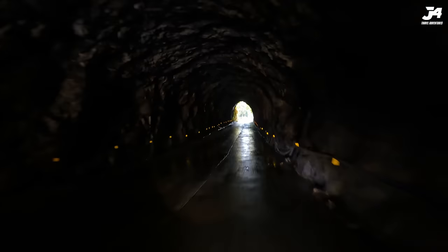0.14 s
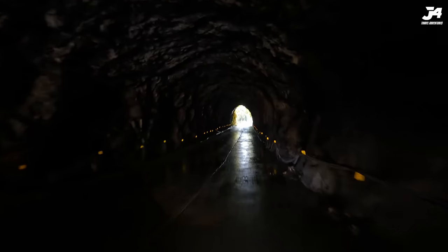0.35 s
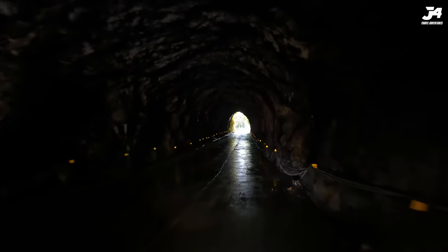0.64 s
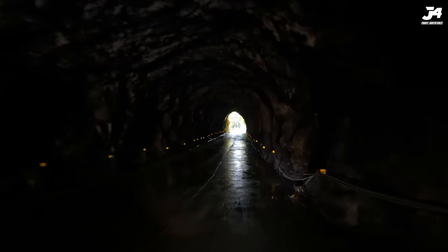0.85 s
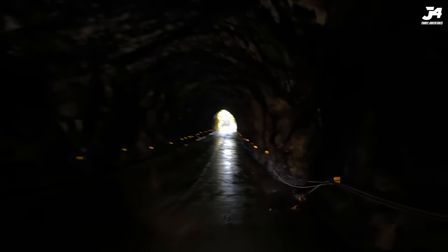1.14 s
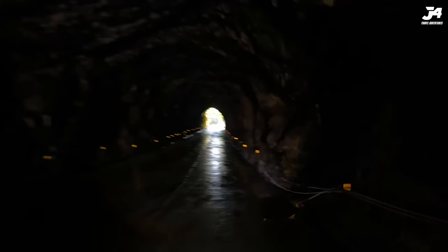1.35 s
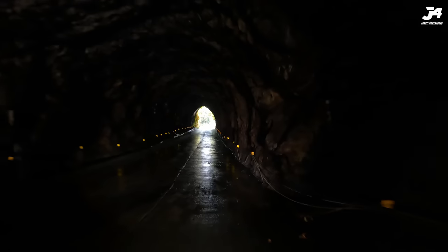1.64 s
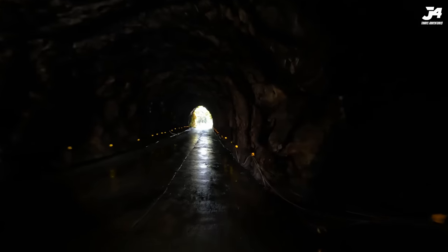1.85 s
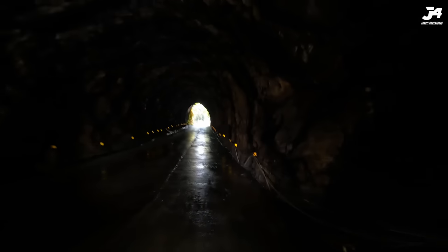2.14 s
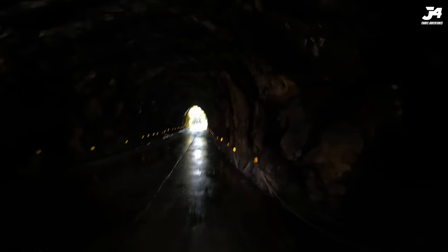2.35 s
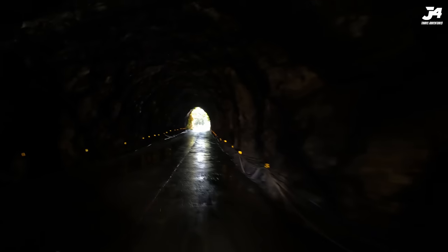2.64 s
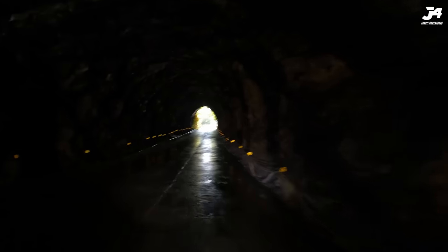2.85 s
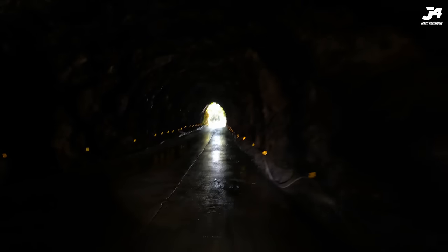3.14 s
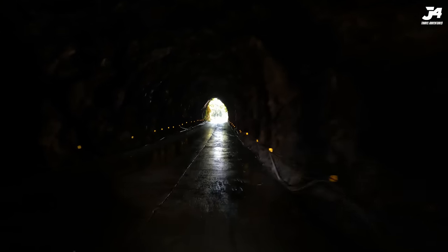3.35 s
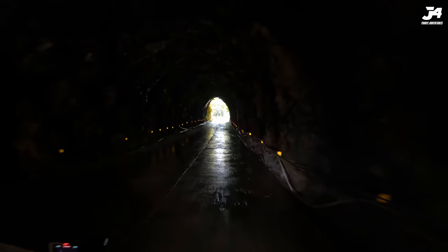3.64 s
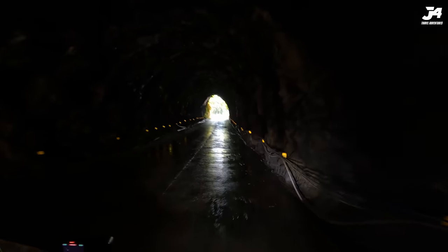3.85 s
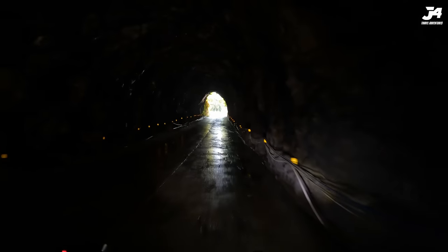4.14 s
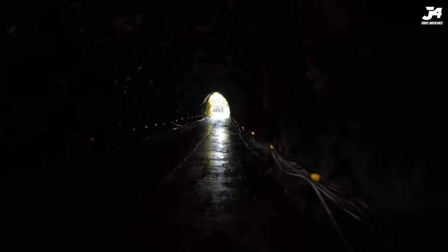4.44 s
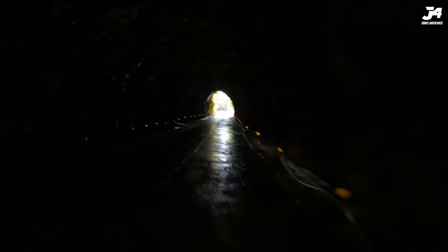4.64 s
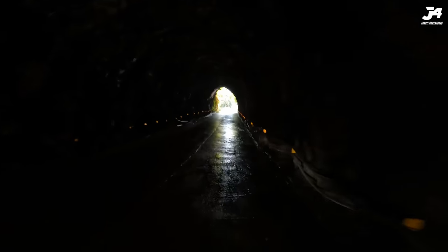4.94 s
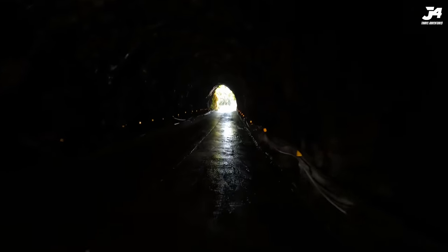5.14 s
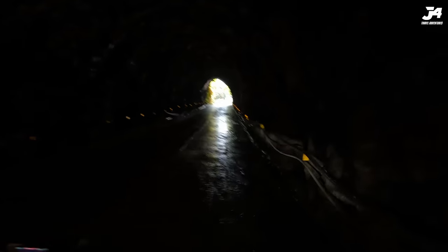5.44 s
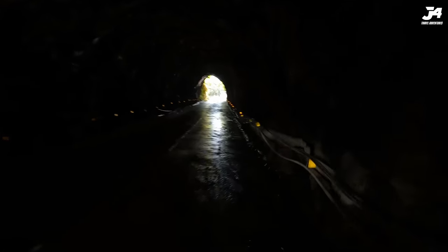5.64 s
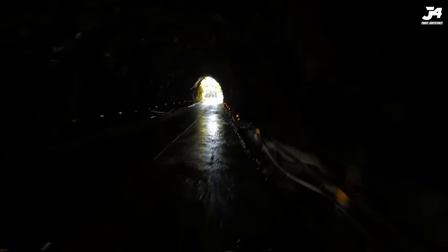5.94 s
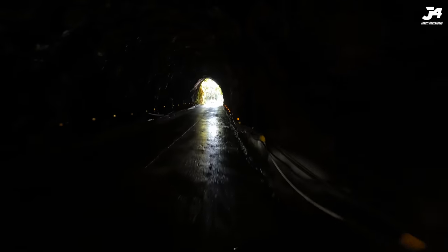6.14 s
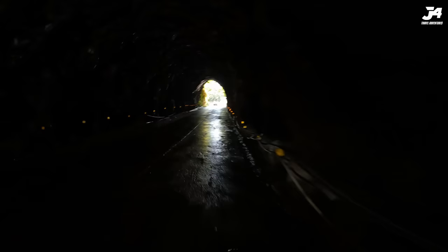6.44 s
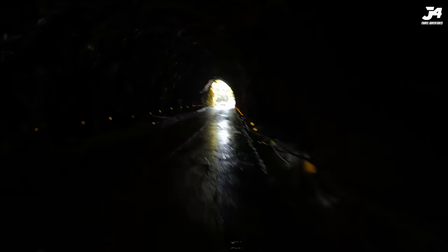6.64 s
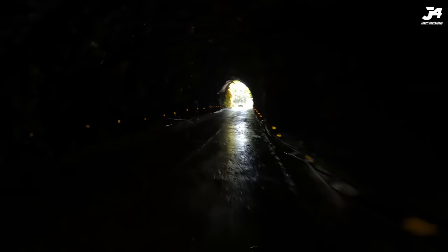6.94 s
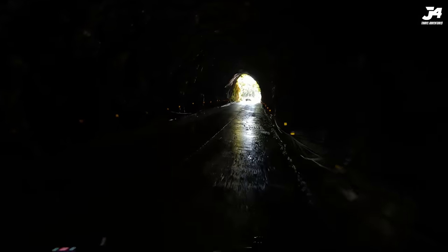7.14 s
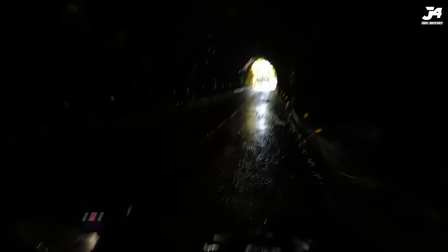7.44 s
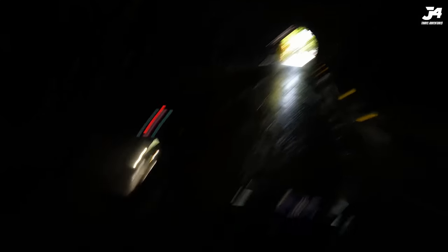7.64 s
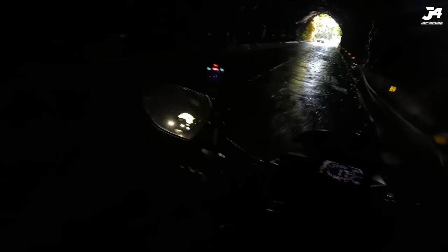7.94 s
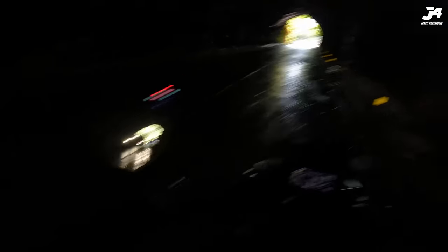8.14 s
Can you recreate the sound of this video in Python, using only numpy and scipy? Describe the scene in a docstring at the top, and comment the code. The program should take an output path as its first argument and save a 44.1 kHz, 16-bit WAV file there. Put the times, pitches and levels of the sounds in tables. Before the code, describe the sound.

A motorcycle rides through a wet rock tunnel, its echoing engine droning and throbbing, easing off and swelling twice over tyre hiss.

```python
"""A twin-cylinder motorcycle rolls through a wet rock tunnel, heard from the bike itself.
Its firings form a pulse train, which reverberation smears into a drone, a roar and a rasp above the
throb of the lowest exhaust orders. The throttle opens twice, each time with a gulp of intake air,
and the tunnel resonates in booms at some low pitches.
Tyre spray hisses on the wet road, and a few thin squeaks pass."""
import sys
import numpy as np
from scipy import signal
from scipy.fft import rfft, irfft, next_fast_len
from scipy.io import wavfile
from scipy.ndimage import uniform_filter1d, map_coordinates

SR = 44100
rng = np.random.default_rng(int(sys.argv[2]) if len(sys.argv) > 2 else 0)


def wav_out(sig):
    """Save sig, one row per channel (or a flat mono array), as 16-bit PCM at SR to the path in sys.argv[1]."""
    wavfile.write(sys.argv[1], SR, np.round(np.clip(np.atleast_2d(sig).T, -1, 1) * 32767).astype(np.int16))


N = 365588
TIME = np.arange(N) / SR


def amp(db):
    return 10 ** (np.asarray(db) / 20)


def unit(x):
    return x / np.sqrt(np.mean(x ** 2) + 1e-20)


def along(points, hz):
    """Interpolation of (Hz, value) points on a logarithmic frequency axis."""
    f, v = np.transpose(points)
    return np.interp(np.log(hz + 1), np.log(f + 1), v)


def curves(rows):
    """Linear interpolation in time: one value per sample for each later column."""
    times, *columns = np.transpose(rows)
    return [np.interp(TIME, times, column) for column in columns]


def wobble(rate):
    """Smooth random modulation with rate knots a second."""
    return map_coordinates(rng.standard_normal(int(N * rate / SR) + 4), [TIME * rate])


def bell(peak_s, length_s):
    """A Gaussian envelope."""
    return np.exp(-2 * ((TIME - peak_s) / length_s) ** 2)


def swells(rows, waver):
    """Phase-modulated tones under Gaussian envelopes."""
    return sum(amp(db) * bell(s, length) * np.sin(2 * np.pi * hz * TIME + waver)
               for s, hz, length, db in rows)


def filtered(x, response):
    """Linear filtering: the spectrum times a frequency response."""
    size = next_fast_len(N + SR // 2)
    return irfft(rfft(x, size) * response(np.fft.rfftfreq(size, 1 / SR)), size)[:N]


def coloured(x, spectrum):
    """Spectral shaping to rms 1, with a roll-off beyond the last point."""
    top_hz = spectrum[-1][0]
    return unit(filtered(x, lambda hz: amp(along(spectrum, hz)) / np.maximum(hz / top_hz, 1) ** 4))


def steady(x):
    """Division by the running rms holds the slow level at 1."""
    power = uniform_filter1d(uniform_filter1d(x ** 2, SR // 6), SR // 6)
    return x / np.sqrt(np.abs(power) + 1e-9)


def built_up(effort_db, lag_s):
    """Energy storage: the tunnel's sound fills and drains with a time constant."""
    keep = np.exp(-1 / (SR * lag_s))
    power = amp(effort_db) ** 2
    return 10 * np.log10(signal.lfilter([1 - keep], [1, -keep], power, zi=[keep * power[0]])[0])


def gain(effort_db, cruise_db, slope, lag_s):
    """A power law: a layer gains slope dB for each dB of built-up effort."""
    return amp(cruise_db + slope * built_up(effort_db, lag_s))


# The squeak's glide. Each row: time in seconds, pitch in Hz, level in dB.
SQUEAK_GLIDE = [(1.11, 8875, -100), (1.135, 9285, -66), (1.19, 9406, -67), (1.25, 9800, -67),
                (1.3, 10200, -72), (1.35, 9780, -69), (1.385, 9990, -70), (1.415, 10020, -76),
                (1.44, 9580, -63), (1.47, 8550, -78), (1.49, 8200, -100)]
# Its partials. Each row: multiple of the pitch, relative level in dB.
PARTIALS = [(.5, -11), (1, -4), (1.215, -18), (1.56, -19)]
# Faint chirps. Each row: peak time in seconds, pitch in Hz, length in seconds, level in dB.
FAINT_CHIRPS = [(1.115, 10600, .022, -74), (5.8, 9300, .06, -68), (5.805, 10620, .06, -73)]


def squeaks():
    """Frequency modulation: a whistle with inharmonic partials glides, and short chirps waver."""
    hz, db = curves(SQUEAK_GLIDE)
    phase = 2 * np.pi * np.cumsum(hz * (1 + .004 * wobble(150))) / SR
    sounding = db > max(db[0], db[-1])
    whistle = np.zeros(N)
    for multiple, partial_db in PARTIALS:
        envelope = amp(db + partial_db + 1.5 + 2 * wobble(30.8))
        whistle += envelope * np.sin(multiple * phase + 0.7 * wobble(280))
    return sounding * whistle + swells(FAINT_CHIRPS, waver=.9 * wobble(250))


# The hiss spectrum. Each row: frequency in Hz, relative gain in dB.
HISS_SPECTRUM = [(1000, -31), (1900, -5.5), (2700, -3), (3250, -0.5), (4100, -7), (4600, -6.5), (5000, -9),
                 (5600, -7.5), (6700, -10), (7700, -10), (9200, -15.5), (10500, -21.5), (12200, -23.5),
                 (13900, -21.5), (15700, -27)]


def hiss(bark, effort_db):
    """Incoherent sources add in power: fine tyre spray joins the top of the engine noise."""
    spray = unit(rng.standard_normal(N) * amp(1.8 * wobble(3000)))
    noise = coloured(bark + 1.44 * spray, HISS_SPECTRUM)
    return gain(effort_db, cruise_db=-55, slope=0.88, lag_s=.005) * noise


# The rock's reverberation. Each row: frequency in Hz, time to decay by 60 dB in seconds.
REVERB_TIMES = [(60, 1.75), (300, 2.24), (1500, 2.8), (5000, 1.03), (14000, 0.26)]


def tunnel(x, direct_db):
    """Time-varying reverberation: each passing stretch of wall has its own impulse response."""
    hop = SR // 5
    running = np.pad(x, (SR, 0), mode="reflect")  # the tunnel is already ringing at the start
    starts = range(0, len(running), hop)
    noise = np.float32(rng.standard_normal((len(starts), SR + SR // 2)))
    hz, t, spectra = signal.stft(noise, SR, nperseg=256)
    decay = np.float32(amp(-60 * t / along(REVERB_TIMES, hz)[:, None]))
    tails = signal.istft(spectra * decay, SR, nperseg=256)[1]
    fade = np.sin(np.linspace(0, np.pi, 2 * hop))
    echo = np.zeros(2 * N)
    for start, tail in zip(starts, tails):
        stretch = running[start:start + len(fade)]
        answer = signal.fftconvolve(stretch * fade[:len(stretch)], tail / np.linalg.norm(tail))
        echo[start:start + len(answer)] += answer
    return unit(echo[SR:SR + N] + amp(direct_db) * x)


# Tunnel booms. Each row: peak time in seconds, pitch in Hz, length in seconds, level in dB.
RESONANCES = [(.25, 131, .5, -38), (1.15, 98, .4, -33), (1.4, 169, .8, -39), (1.4, 345, .6, -44),
              (1.7, 108, .35, -35), (1.85, 95, .4, -38), (2.45, 610, .12, -38), (2.5, 152, .45, -29.5),
              (3.1, 155, .6, -34), (3.45, 87, .5, -35), (4.35, 115, .5, -34.5), (4.84, 595, .12, -42),
              (4.9, 375, .2, -43), (4.8, 125, .3, -43), (6.9, 210, .6, -34), (7.1, 440, .14, -35),
              (8.1, 147, .5, -32)]


def tunnel_booms():
    """Resonance: the tunnel swells at single pitches."""
    return swells(RESONANCES, waver=0.36 * wobble(9))


# Throttle openings. Each row: start in seconds, peak level in dB.
THROTTLE_OPENINGS = [(1.86, -53.5), (5.23, -53)]
# The spectrum of the inrushing air. Each row: frequency in Hz, relative gain in dB.
GULP_SPECTRUM = [(900, -19), (1400, -1), (2000, 1.5), (2700, -2), (3400, -9), (4300, -15), (7000, -21)]


def intake(attack_s=0.066, decay_s=.15):
    """Flow noise: a short bright rush of air as the throttle snaps open."""
    envelope = np.zeros(N)
    for start, db in THROTTLE_OPENINGS:
        rise = np.clip((TIME - start) / attack_s, 0, 1)
        fall = np.exp(-np.maximum(TIME - start - attack_s, 0) / decay_s)
        envelope += amp(db) * rise * fall
    return envelope * coloured(rng.standard_normal(N), GULP_SPECTRUM)


# The rumble spectrum. Each row: frequency in Hz, relative gain in dB.
RUMBLE_SPECTRUM = [(8, -20), (18, -23), (27, -3), (33, -2), (42, 4), (50, 2.5), (64, 4), (82, -10),
                   (120, -5)]


def rumble(effort_db):
    """Band-limited noise in the deep bass follows the effort slowly."""
    noise = steady(coloured(rng.standard_normal(N), RUMBLE_SPECTRUM))
    return gain(effort_db, cruise_db=-41, slope=0.98, lag_s=0.2) * noise


# The lowest exhaust harmonics. Each row: order (multiple of the cycle rate), initial cruising level
# in dB, dB per dB of effort, growth in dB per second.
EXHAUST_ORDERS = [(2, -37.5, 0.74, 1.17), (3, -45, 0.9, 1.5), (4, -44.5, 0.66, 0.97)]
# Swells and dips of single low exhaust tones.
# Each row: time in seconds, order, length in seconds, gain in dB.
ORDER_SWELLS = [(.15, 2, 0.46, 6), (1.5, 2, 0.34, -1.5), (2.152, 4, 0.24, 6), (2.433, 4, .12, -11),
                (2.6, 3, 0.32, 4), (3.602, 3, 0.68, -6), (3.6, 4, 0.13, -2), (3.783, 2, 0.39, 8.5),
                (4.3, 4, .2, 9), (4.7, 2, 0.92, 5), (4.802, 4, 0.35, 7.5), (5.599, 4, 0.51, 5.5),
                (6.104, 2, 0.6, 4.5), (6.27, 3, 0.34, 9), (6.649, 2, .35, -3), (6.65, 3, 0.18, -6),
                (7.047, 3, 0.22, 9), (7.15, 4, .3, 3), (7.6, 2, .4, 4), (8, 4, .25, -7)]
# Brief surges of the throb. Each row: peak time in seconds, gain in dB.
THROB_SURGES = [(3.63, 3), (3.78, 4), (3.96, 5), (4.28, 4), (4.37, 5.5), (5.52, 6), (5.66, 5), (6.03, 3.5),
                (7.09, 2.5)]


def throb(cycle, effort_db, echo_s=.45, echo_db=-9.5):
    """Interference: each low order beats against its echo, which holds an earlier engine speed."""
    def tone(turns):
        return np.sin(2 * np.pi * turns + 0.3 * wobble(8))

    echo_cycle = np.interp(TIME - echo_s, TIME, np.gradient(cycle)).cumsum()
    held_db = built_up(effort_db, lag_s=0.04)
    surge_db = sum(db * bell(s, length_s=0.04) for s, db in THROB_SURGES)
    orders = np.zeros(N)
    for order, cruise_db, slope, db_per_s in EXHAUST_ORDERS:
        swell_db = sum(db * bell(s, length) for s, which, length, db in ORDER_SWELLS if which == order)
        drive_db = cruise_db + slope * held_db + db_per_s * TIME
        envelope = amp(drive_db + swell_db + surge_db + 1.63 * wobble(14))
        direct = tone(order * cycle)
        echo = amp(echo_db) * tone(order * echo_cycle + rng.random())
        orders += envelope * (direct + echo)
    return orders


# The silencer's passband. Each row: frequency in Hz, relative gain in dB.
DRONE_SPECTRUM = [(55, -44), (84, -6), (98, -1.5), (130, -2.5), (160, -1.5), (220, -4), (400, -21)]
# The drone's upper edge: duller in the slow stretches, brighter late on.
# Each row: time in seconds, cutoff in Hz.
DRONE_CUTOFF = [(0, 158), (1.8, 163), (2.4, 190), (3.8, 168), (4.5, 143), (5.2, 143), (5.7, 149),
                (6.1, 185.9), (6.9, 214), (7.6, 182), (8.29, 195)]


def drone(bark, booms, effort_db):
    """Low-pass filtering: the silencer passes a drone, which dips during a boom so the boom stands out."""
    hz, t, spectra = signal.stft(coloured(bark, DRONE_SPECTRUM), SR, nperseg=8192)
    cutoff_hz = np.interp(t, *np.transpose(DRONE_CUTOFF))
    passed = spectra / np.sqrt(1 + (hz[:, None] / cutoff_hz) ** 16)
    band = steady(signal.istft(passed, SR, nperseg=8192)[1][:N])
    envelope = gain(effort_db, cruise_db=-34.5, slope=0.37, lag_s=0.092)
    boom_power = uniform_filter1d(filtered(booms, lambda hz: hz > 75) ** 2, SR // 5)
    dip = np.sqrt(np.clip(1 - boom_power / envelope ** 2, .35, 1))
    return envelope * dip * band


# The exhaust's middle and upper bands. Each row: frequency in Hz, relative gain in dB.
ROAR_SPECTRUM = [(110, -11), (170, -8), (230, -4), (270, -1), (310, 0), (355, 0.3), (440, -2), (490, -2),
                 (540, -2), (590, -1.5), (690, -5.5), (850, -11.5), (1000, -21), (2500, -65)]
RASP_SPECTRUM = [(600, -20.5), (900, -2), (1010, -5.5), (1170, 0.5), (1360, -1.5), (1600, -6),
                 (1850, -14.5), (2200, -25), (2900, -35.5), (6000, -85)]


def exhaust(bark, effort_db):
    """Source and filter: two bands of the echoing firings roar and rasp as the throttle opens."""
    roar = steady(coloured(bark, ROAR_SPECTRUM))
    rasp = steady(coloured(bark, RASP_SPECTRUM))
    return (gain(effort_db, cruise_db=-36, slope=1.07, lag_s=0.014) * roar
            + gain(effort_db, cruise_db=-44.5, slope=1.1, lag_s=0.0039) * rasp)


def firings(cycle, lag_cycles=.44, scatter_db=2, jitter_s=.0005, puff_s=0.0062, steady_flow=0.41):
    """A pulse train: two cylinders fire lag_cycles apart, each with a dying puff of turbulent gas."""
    turns = (np.arange(int(cycle[-1]))[:, None] + [0, lag_cycles]).ravel()
    timing, strength = rng.standard_normal((len(turns), 2)).T
    at = np.interp(turns, cycle, np.arange(N)) + jitter_s * SR * timing
    pulses = np.bincount(np.clip(at, 0, N - 1).astype(int), amp(scatter_db * strength), N)
    puff = np.exp(-TIME[:SR // 10] / puff_s)
    flow = steady_flow + signal.fftconvolve(pulses, puff)[:N]
    return .55 * unit(pulses) + unit(flow * rng.standard_normal(N))


# Engine speed. Each row: time in seconds, four-stroke cycles per second.
ENGINE_SPEED = [(0, 14.7), (.6, 14.6), (1.75, 13.4), (2.2, 16.4), (2.7, 18.7), (3.1, 17.6), (3.5, 19.6),
                (4, 19.9), (4.4, 14), (5.2, 13.2), (5.5, 18.3), (5.9, 18.5), (6.4, 18.7), (7, 17.75),
                (7.5, 17.9), (8.29, 17.2)]
# How hard the engine pulls. Each row: time in seconds, effort in dB above cruising.
ENGINE_EFFORT = [(0.0, -0.8), (0.45, -4.3), (1.1, -4.9), (1.8, -4), (2.1, 1.1), (2.45, 4), (3.05, -0.3),
                 (4.05, 0.34), (4.5, -4), (5.2, -5.5), (5.45, 1.5), (6.05, 4), (6.4, 3), (6.7, 4.5),
                 (7.12, 3.5), (7.4, 2.5), (7.7, 2.5), (8.29, 3)]


def scene():
    """Superposition of all sources: speed times the firings, and effort sets the engine's loudness."""
    speed, = curves(ENGINE_SPEED)
    effort_db, = curves(ENGINE_EFFORT)
    cycle = np.cumsum(speed * (1 + .006 * wobble(5))) / SR
    bark = tunnel(firings(cycle), direct_db=-8.5)
    bass = throb(cycle, effort_db) + rumble(effort_db)
    booms = tunnel_booms()
    engine = bass + drone(bark, booms, effort_db) + exhaust(bark, effort_db) + intake()
    return (engine + booms + squeaks() + hiss(bark, effort_db))[None]


def record(dry, top_hz=15700):
    """Band limiting: an ideal low-pass filter removes the highest treble."""
    return filtered(dry[0], lambda hz: hz < top_hz)[None]


dry = scene()
out = record(dry)
wav_out(out)
```